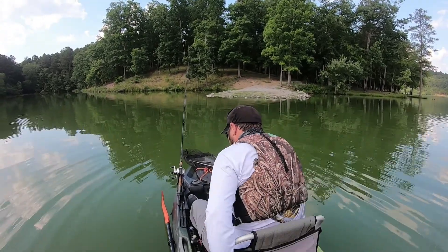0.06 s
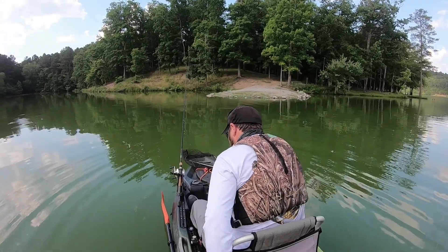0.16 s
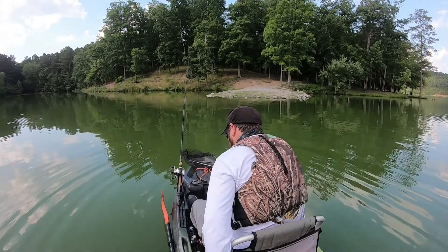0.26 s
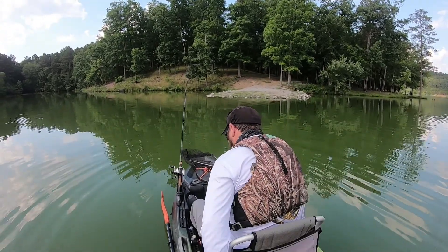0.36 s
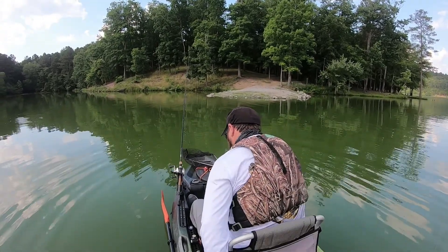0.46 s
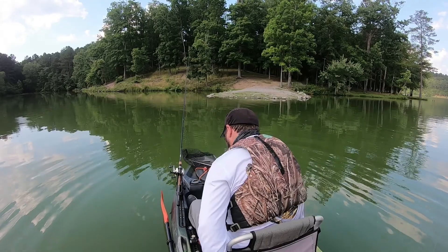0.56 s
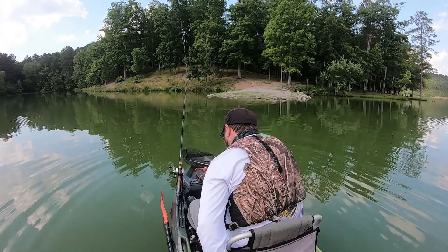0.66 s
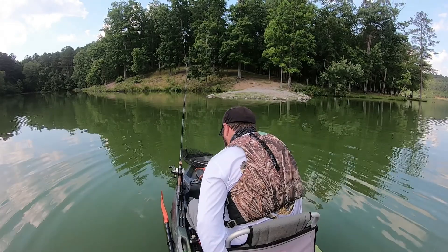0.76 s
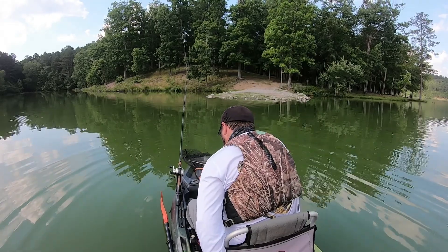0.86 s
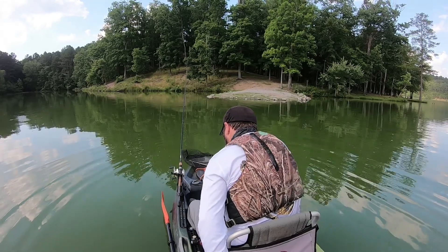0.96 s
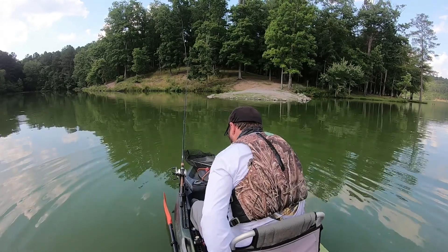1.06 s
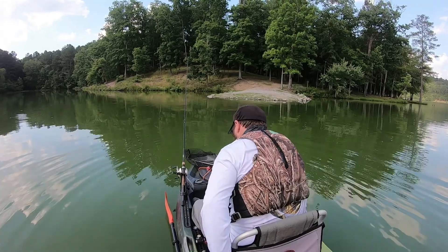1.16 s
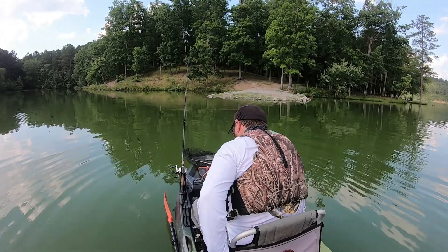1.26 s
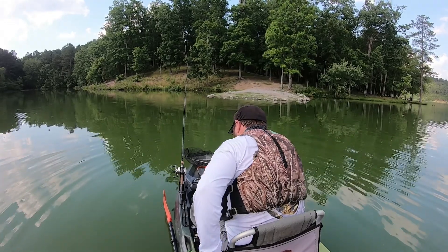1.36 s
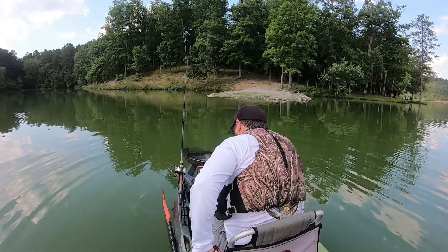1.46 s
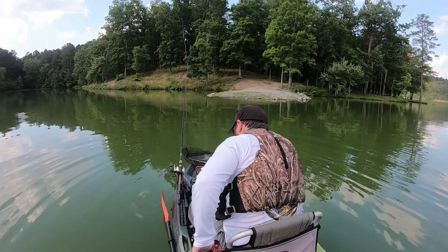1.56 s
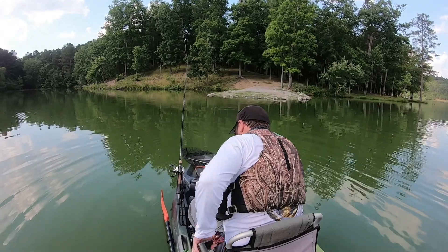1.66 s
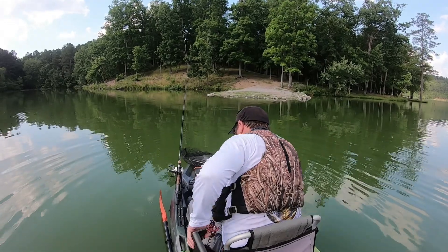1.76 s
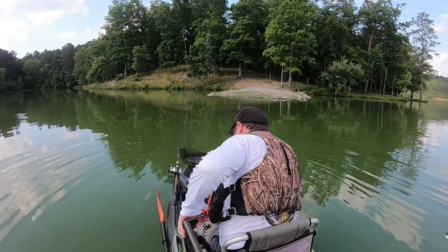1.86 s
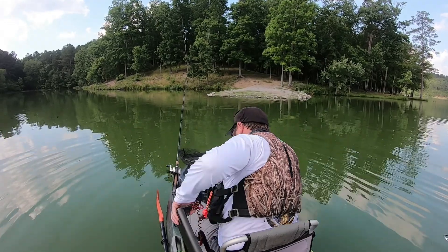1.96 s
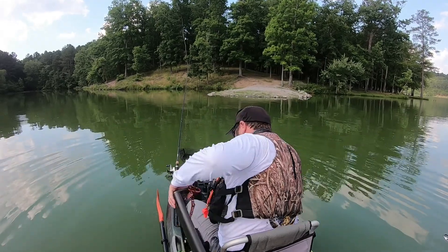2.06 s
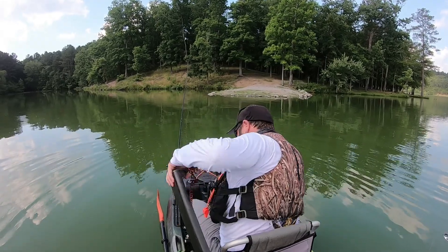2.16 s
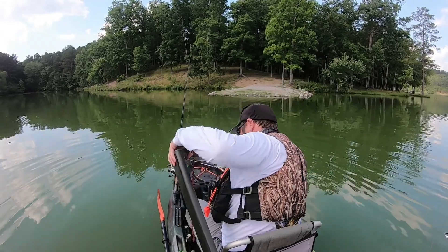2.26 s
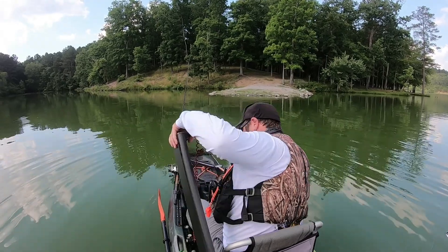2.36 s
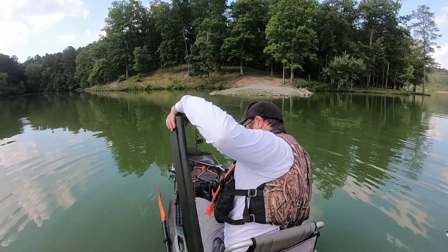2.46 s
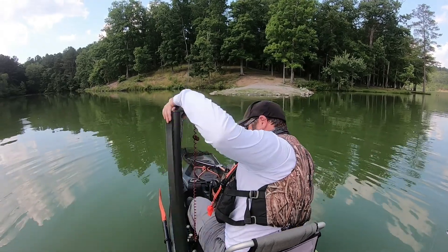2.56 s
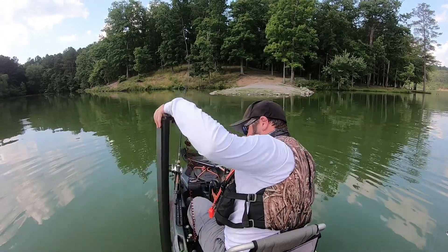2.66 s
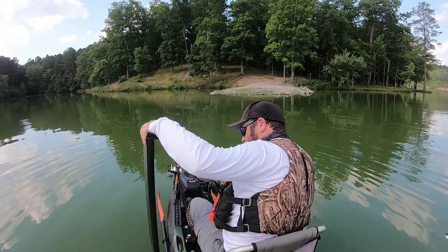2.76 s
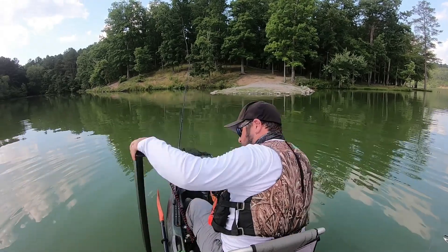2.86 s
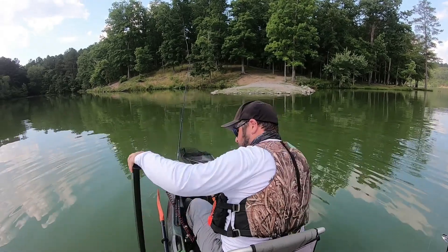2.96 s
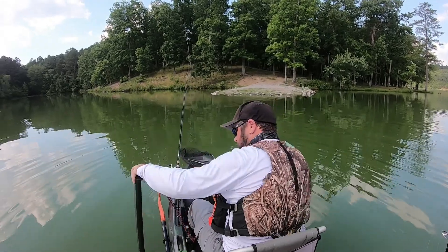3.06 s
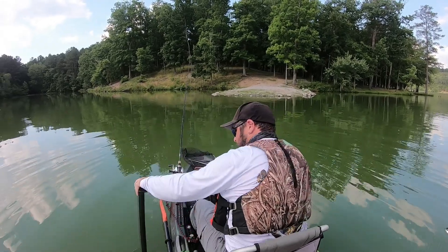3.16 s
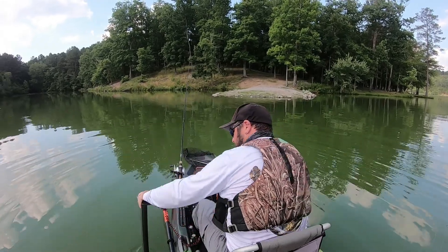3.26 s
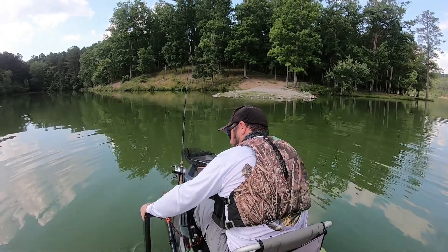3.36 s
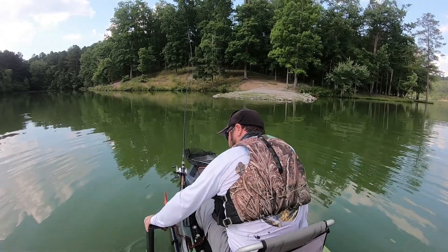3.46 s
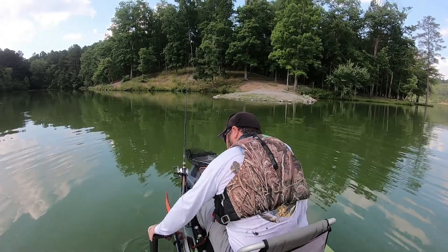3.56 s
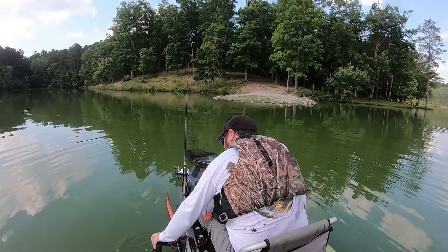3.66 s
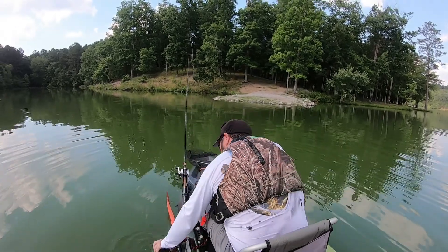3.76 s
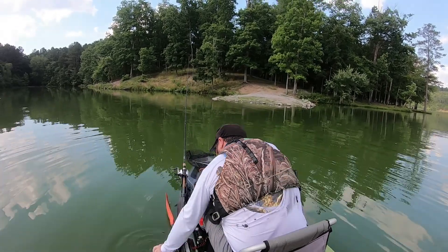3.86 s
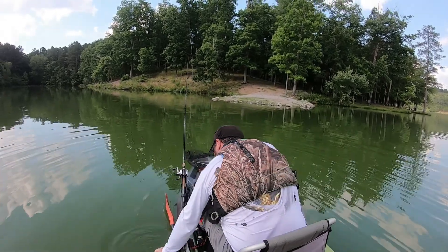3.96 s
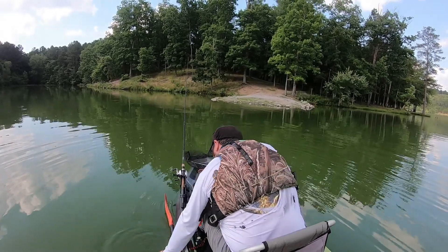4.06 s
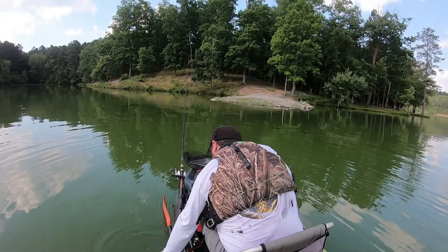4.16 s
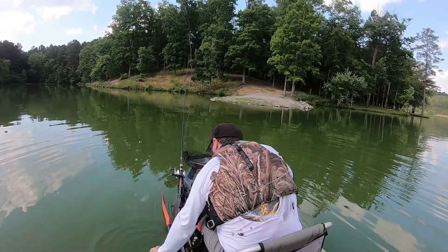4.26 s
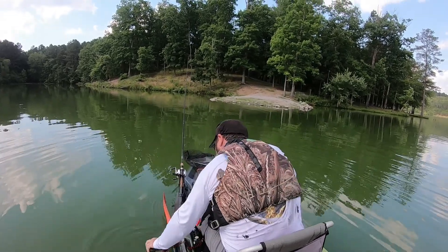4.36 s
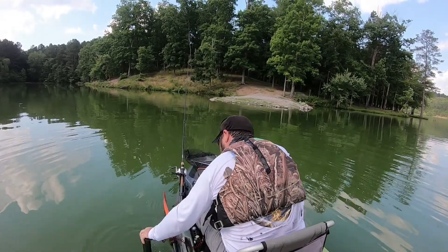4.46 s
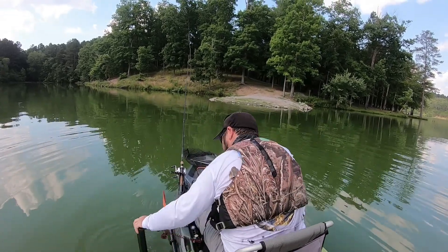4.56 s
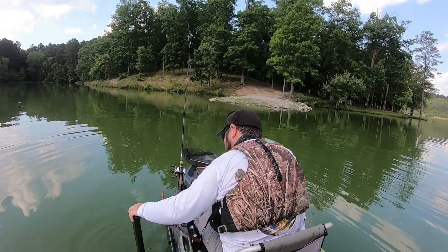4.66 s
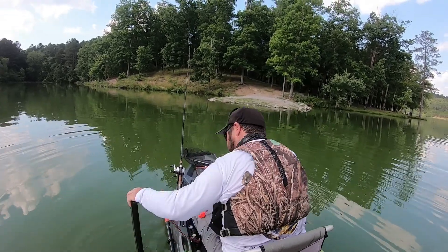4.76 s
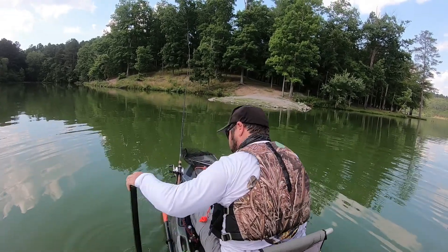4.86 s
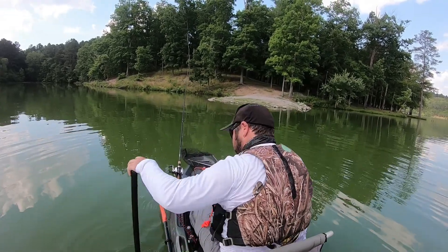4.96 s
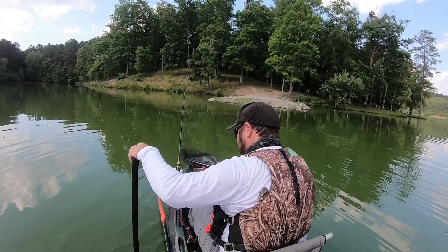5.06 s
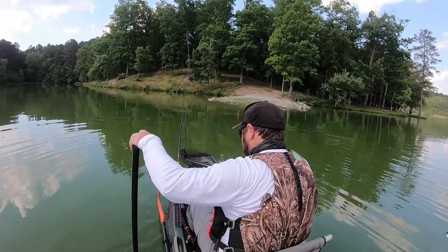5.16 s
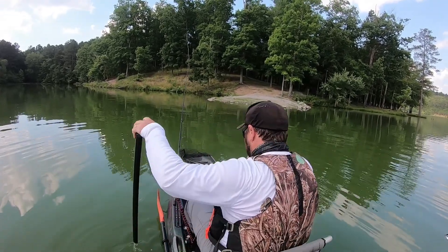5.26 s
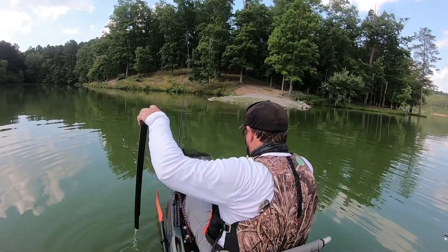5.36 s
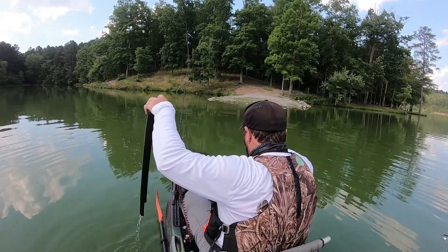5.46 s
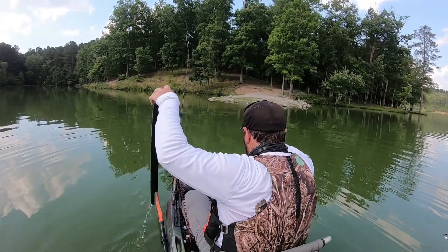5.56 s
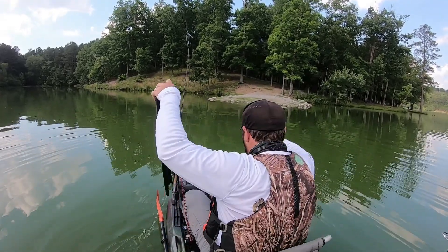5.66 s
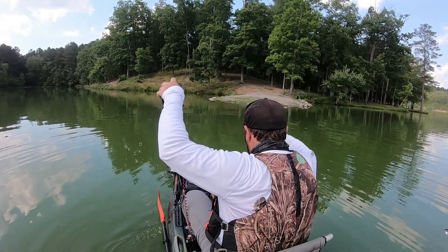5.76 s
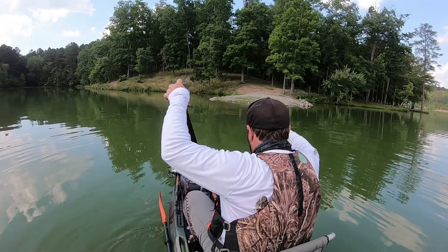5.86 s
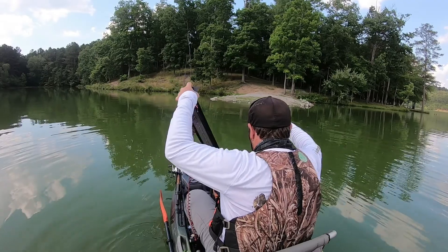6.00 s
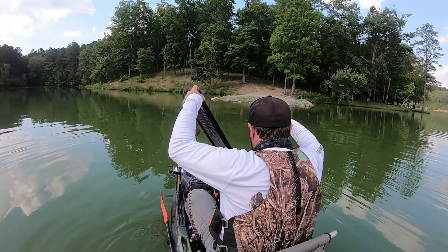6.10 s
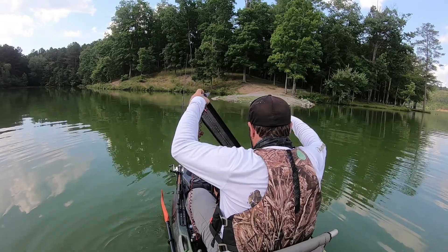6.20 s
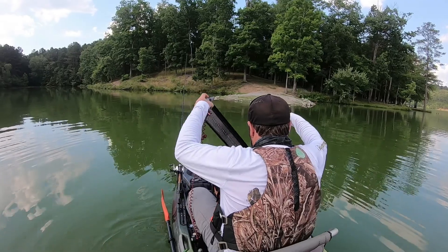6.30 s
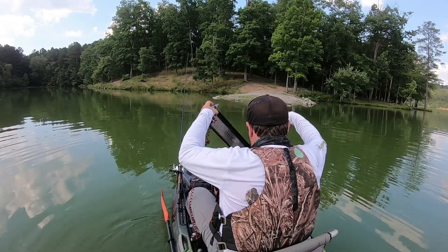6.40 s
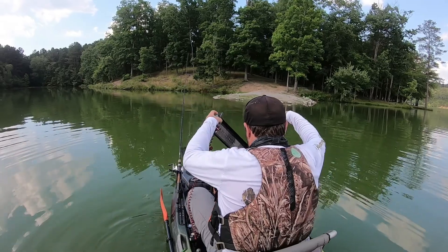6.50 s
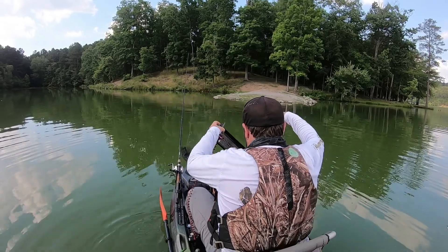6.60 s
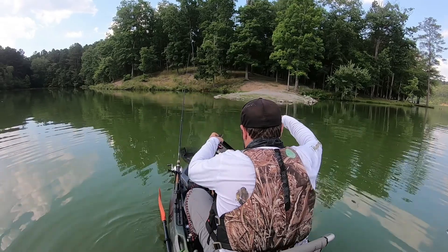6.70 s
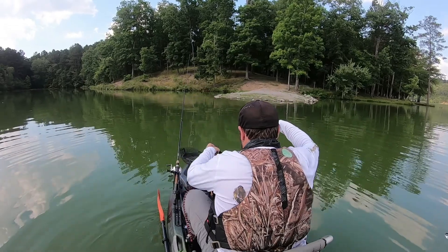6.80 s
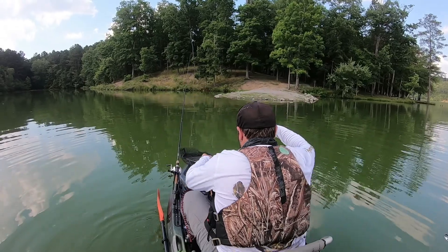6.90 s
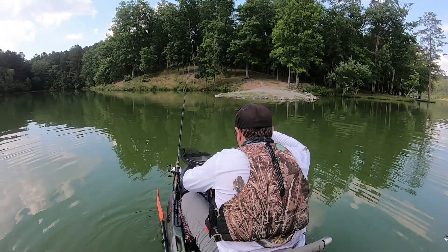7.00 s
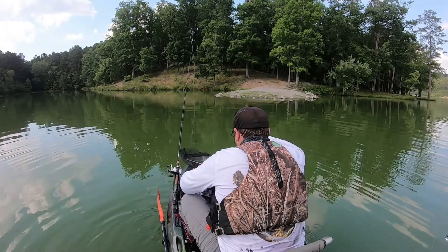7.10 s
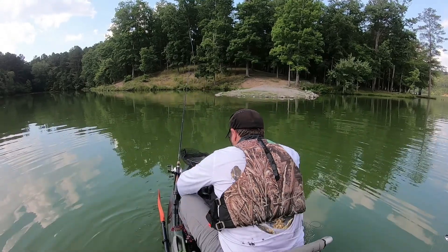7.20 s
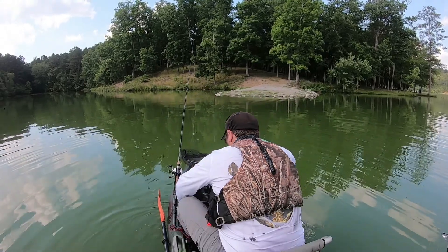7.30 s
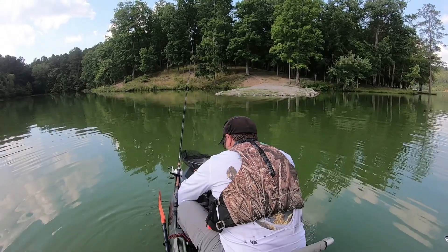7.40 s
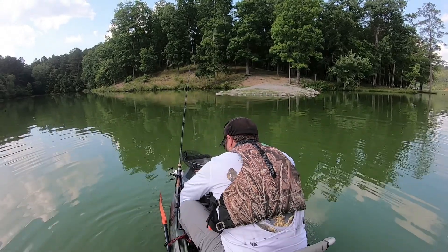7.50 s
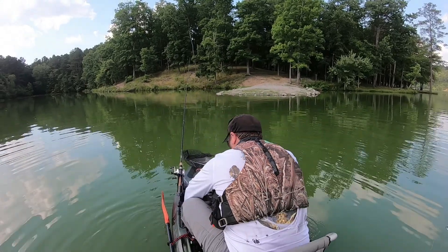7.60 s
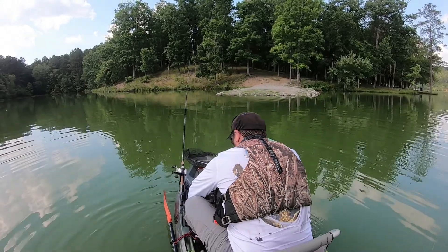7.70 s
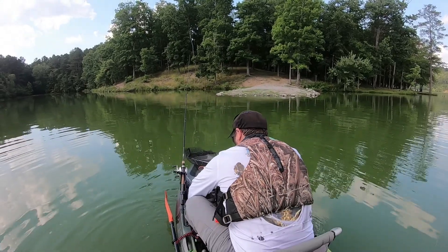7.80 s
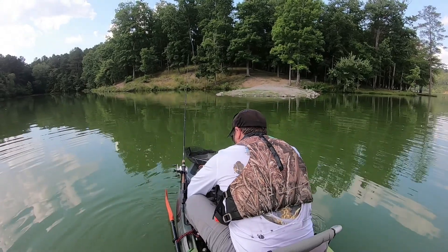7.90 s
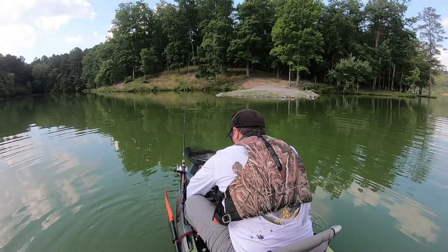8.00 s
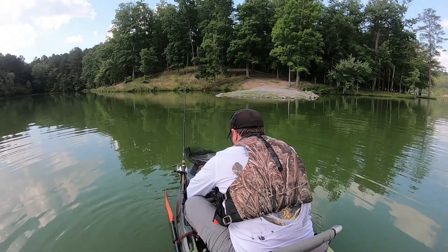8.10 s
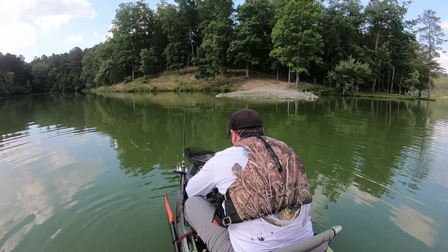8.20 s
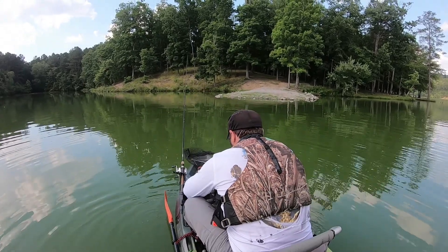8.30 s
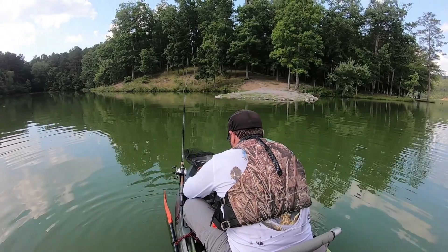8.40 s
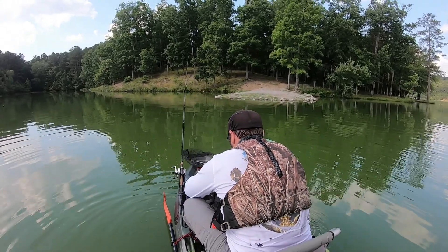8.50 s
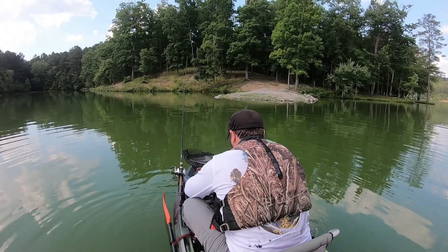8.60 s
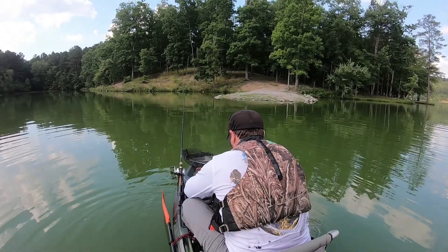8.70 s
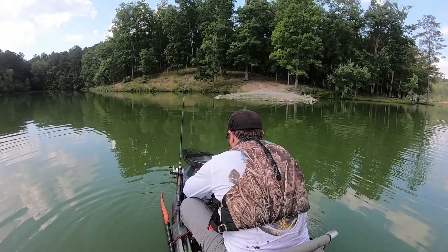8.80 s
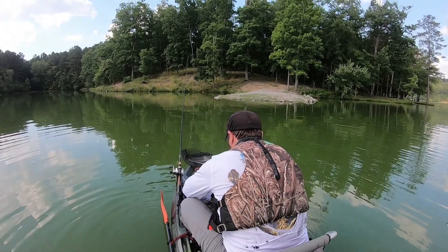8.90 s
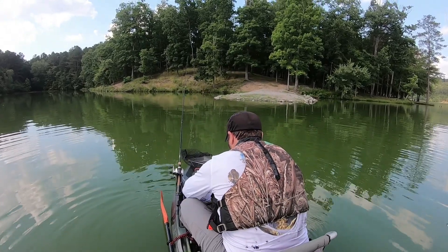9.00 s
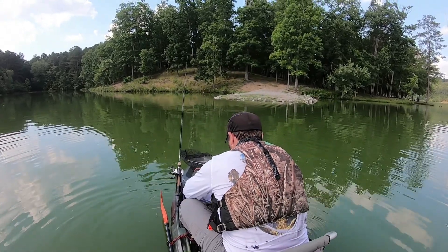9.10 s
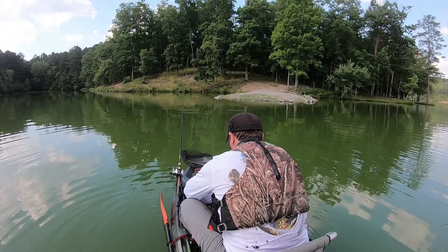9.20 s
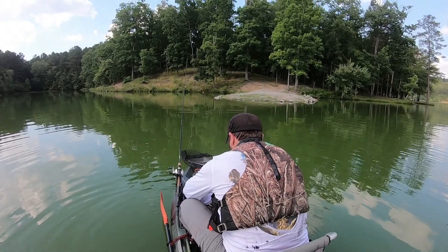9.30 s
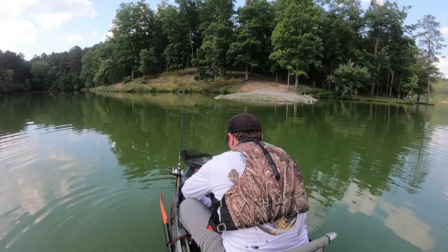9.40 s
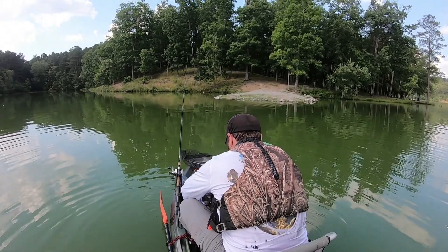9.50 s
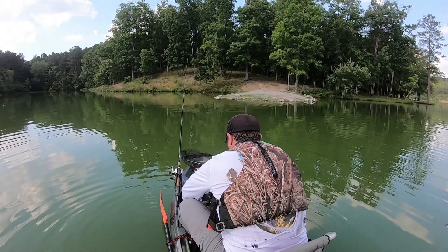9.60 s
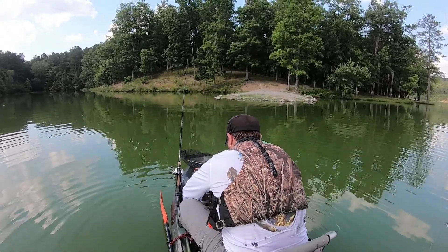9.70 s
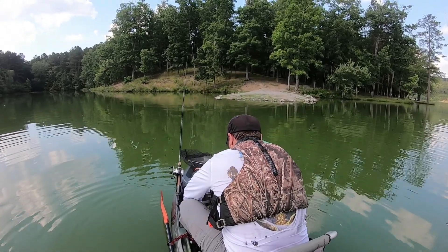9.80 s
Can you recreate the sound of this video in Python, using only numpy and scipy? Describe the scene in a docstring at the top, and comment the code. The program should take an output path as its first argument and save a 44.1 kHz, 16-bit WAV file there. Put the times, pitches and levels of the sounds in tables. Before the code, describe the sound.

Gear knocks, rattles and thumps in a hollow plastic kayak, with rustling cloth, water drips and faint birds.

```python
"""Shifting gear in a plastic kayak

On a calm lake, knocks ring the hull, the gear and small fittings, and a stiff joint clicks under load.
The hull booms and shakes a pole on the stern, which carries the two microphone ports we listen through.
Cloth and straps rustle, water drips from a lifted board, and birds sing from the wooded shore."""
import sys
import numpy as np
from scipy import signal
from scipy.fft import rfft, irfft, next_fast_len
from scipy.io import wavfile
from scipy.ndimage import uniform_filter1d

SR = 44100
rng = np.random.default_rng(int(sys.argv[2]) if len(sys.argv) > 2 else 0)


def store_pcm(level_fs):
    """Save levels as 16-bit WAV."""
    pcm = np.round(np.clip(level_fs, -1, 1) * 32767).astype(np.int16)
    wavfile.write(sys.argv[1], SR, np.atleast_2d(pcm).T)


N = 434385
T = np.arange(N) / SR
SIDE = np.array([[1], [-1]])  # opposite polarity left and right


def undb(db):
    return 10 ** (np.asarray(db) / 20)


def unit_rms(x):
    return x / np.sqrt(np.mean(x ** 2))


def decay(t, t60):
    return np.exp(-np.log(1000) * t / t60)


def curves(table):
    """Draw a table's columns out over time."""
    times, *columns = np.transpose(table)
    return [np.interp(T, times, column) for column in columns]


def resonate(x, hz, width_hz):
    return signal.lfilter(*signal.iirpeak(hz, hz / width_hz, fs=SR), x)


def bandpass(x, low_hz, high_hz):
    return signal.sosfilt(signal.butter(3, (low_hz, high_hz), "band", fs=SR, output="sos"), x)


def wander(per_s):
    """A smooth drift through random values."""
    hold = int(SR / per_s)
    steps = np.repeat(rng.standard_normal(N // hold + 1), hold)
    return uniform_filter1d(uniform_filter1d(steps, hold), hold)[:N]


def add(out, start, sound):
    """Mix a short sound in at start seconds."""
    i = int(start * SR)
    sound = sound[..., :N - i]
    out[:, i:i + sound.shape[-1]] += sound


def envelope(events, column, fade_db_per_s, attack_s=0.018):
    """Each event rises quickly to the level in the given column, holds, then fades."""
    power = np.zeros(N)
    for row in events:
        start, hold = row[:2]
        near = slice(max(int((start - attack_s) * SR), 0), int((start + 1) * SR))
        t = T[near] - start
        rise = np.clip(1 + t / attack_s, 0, 1)
        power[near] += (rise * undb(row[column] - fade_db_per_s * np.clip(t - hold, 0, 1))) ** 2
    return np.sqrt(power)


def strike(modes, db, grit, reach, focus_hz=None):
    """Grit rings the modes, favouring any near the focus, and cracks up to reach times the top mode."""
    t = T[:len(grit)]
    hz, mode_db, t60 = np.transpose(modes)[:, :, None]
    loudness, detune, skew = rng.standard_normal((3, len(modes), 1))
    if focus_hz:
        mode_db = mode_db - 14 * np.abs(np.log2(hz / focus_hz))
    lead = hz / 6000 * skew * SIDE[:, None] / 2  # each mode reaches one port slightly ahead
    tones = np.sin(2 * np.pi * hz * (1 + 0.052 * detune) * t + lead)
    ring = (undb(mode_db + 2 * loudness) * tones * decay(t, t60)).sum(1)
    body = signal.fftconvolve(ring, grit[None], axes=1)[:, :len(t)]
    crack = 0.84 * grit / np.abs(grit).max()
    hit = bandpass(body / np.abs(body).max() + crack, 0.48 * hz.min(), reach * hz.max())
    return undb(db) * hit / np.sqrt(uniform_filter1d(hit ** 2, SR // 200).max())  # db sets the loudest 5 ms


# What a knock rings, low to high: the hollow, hull panels, gear, fittings and the snap on top.
# Each row: pitch in Hz, relative level in dB, 60 dB ring time in seconds.
HOLLOW_MODES = [(300.2, -3.5, 0.08), (391.6, -0.7, 0.066), (465, -3.5, 0.068), (550.4, -3, 0.05),
                (627, 0, 0.025)]
PANEL_MODES = [(690, -2, .02), (800, -4, .018), (880, 0, .018), (1010, 0, .016), (1150, -3, .015),
               (1335, -3, .015), (1470, -4, .014)]
GEAR_MODES = [(1725, -2.5, 0.014), (1920, -0.5, 0.021), (2270, 3, 0.0082), (2535, 0, 0.022),
              (2600, -7.5, 0.017), (2910, 10.5, 0.011), (3304, 10.5, 0.012), (3930, 16, 0.0066),
              (4410, 9.5, 0.013), (4900, 9, 0.01)]
FITTING_MODES = [(5200, -2, .006), (5900, -3, .006), (6600, -2, .006), (7300, -2, .005), (8000, 1, .006),
                 (8600, 1, .007)]
SNAP_MODES = [(10800, 0, .004), (12000, -3, .004), (13500, -7, .003), (14500, -10, .003)]
# Gear, buckles and board making contact. Each row: start in seconds, levels of gear, hollow, panels
# and fittings in dB, focus of the gear's ring in Hz.
KNOCKS = [(0.2367, -60, -45.5, -50.5, -60, 2110), (0.38, -67, -44, -54, -83, 1710),
          (0.4722, -33.5, -35.5, -43, -30, 2920), (0.6616, -43.5, -43, -44, -47, 2330),
          (0.6889, -46, -42.5, -48, -62, 2680), (0.8215, -45, -43, -43, -68, 1760),
          (1, -45, -46, -43, -63, 1840), (1.037, -49, -51, -62, -75, 2430),
          (1.0705, -55, -50, -47.5, -70, 1800), (1.103, -46.5, -41.5, -55, -52.5, 3480),
          (1.292, -47, -33, -38, -56, 1740), (1.3233, -40, -39, -32.5, -48, 1712),
          (1.3667, -49, -35, -34.5, -49, 1730), (1.4073, -45, -44, -43, -51, 1960),
          (1.4415, -25.5, -25, -24.5, -31, 1730), (1.4502, -39, -23, -34, -42, 1990),
          (1.4718, -42, -39, -32.5, -54, 1710), (1.6157, -34, -45, -42, -42, 2420),
          (1.6254, -29, -27.5, -22, -40.5, 1860), (1.6853, -50, -32.5, -38, -63, 1820),
          (1.7157, -31, -34.5, -39, -46, 2740), (1.732, -25, -29, -17, -39.5, 1710),
          (1.755, -43, -36, -43, -61, 2650), (1.7635, -38, -48, -28.5, -61, 1920),
          (1.7874, -39, -39, -42, -65, 1980), (1.7957, -41, -28, -28.5, -68, 1980),
          (1.8162, -29.5, -27, -21.5, -54, 2000), (1.8313, -36, -23.5, -37, -60, 2930),
          (1.8828, -33, -30.5, -32.5, -51, 3480), (1.9573, -36, -15.5, -32, -60, 1980),
          (1.9681, -34, -34.5, -25, -51, 2830), (2.0113, -36.5, -34, -35, -55, 2640),
          (2.0349, -29, -22, -22, -50, 2000), (2.213, -46, -45, -38.5, -67, 2230),
          (2.2392, -22, -16.5, -16, -48, 1630), (2.2469, -28, -16, -23, -63, 1690),
          (2.256, -42, -30, -28, -62, 2300), (2.2855, -32, -48, -37, -66, 3600),
          (2.2793, -31, -44.5, -56, -61, 2450), (2.2941, -34, -45, -37, -42.5, 3220),
          (2.528, -54.5, -71, -68, -71, 4300), (3.0175, -55.5, -48.5, -56, -57, 3310),
          (3.119, -39, -32, -39, -43, 2470), (3.1241, -36, -38, -46, -64, 5000),
          (3.4736, -48.5, -48, -54, -68, 2660), (3.6638, -35.5, -40.5, -36.5, -51.5, 2020),
          (3.7523, -46, -70, -55, -84, 2940), (3.8512, -30.5, -22.5, -28.5, -57, 3880),
          (3.863, -50, -27.5, -35.5, -75, 1920), (3.877, -61, -34, -41, -78, 1900),
          (3.897, -47, -46, -53, -71, 1660), (3.966, -55, -46, -52, -55, 1800),
          (4, -50.5, -66, -49.5, -78, 1770), (4.055, -50, -57, -54, -59, 2960),
          (4.0765, -33.5, -40, -34.5, -37.5, 3760), (4.094, -66, -56, -52, -68, 1800),
          (4.2681, -50.5, -73, -54, -85, 1730), (4.487, -47.5, -72, -61, -71, 4550),
          (4.6038, -42.5, -64, -60, -53.5, 2900), (4.6903, -44, -48.5, -51.5, -56, 2800),
          (4.7069, -45.5, -43, -61, -61, 2430), (4.9232, -56, -56, -51.5, -80, 2100),
          (4.989, -54, -45, -48, -81, 1710), (5.1748, -47, -45, -45.5, -72, 1910),
          (5.2533, -49.5, -44.5, -45, -72, 2030), (5.3773, -51, -44.5, -45, -79, 1940),
          (5.443, -43.5, -60, -60, -55.5, 4380), (5.5515, -50, -49, -52, -58, 3150),
          (5.654, -48, -61, -62, -50, 4740), (5.7674, -76, -60, -77, -60, 2900),
          (5.7902, -79, -57, -78, -54.5, 2860), (6.0027, -45.5, -39.5, -43, -52.5, 3266),
          (6.0334, -49, -49.5, -55, -58, 2090), (6.355, -55.5, -46, -56, -66, 2480),
          (5.955, -59, -51, -59, -72, 2670), (6.308, -62, -50.5, -53, -75, 1840),
          (6.327, -55.5, -52, -68, -75, 3016), (6.45, -67, -52, -58, -62, 1983),
          (.218, -59, -54.5, -54, -78, 1750), (.548, -54, -58, -54, -63, 2010),
          (8.502, -68, -50.5, -58, -72, 2300), (6.8839, -44.5, -38, -37.5, -62, 1900),
          (6.893, -53, -43.5, -46, -67, 2494), (6.9641, -57, -39.5, -45.5, -73, 2140),
          (6.976, -62, -43.5, -60, -75, 1985), (7.204, -55, -43, -42, -70, 2190),
          (7.2439, -50, -35.5, -49, -75, 2306), (7.2806, -46, -54, -40, -57, 3240),
          (7.2974, -35, -39, -43, -43.5, 3790), (7.4999, -58.5, -51.5, -51, -74, 1844),
          (7.8605, -53, -73.5, -58.5, -76.5, 3000), (8.092, -61, -47.5, -54.5, -84, 1710),
          (8.1364, -57.5, -68, -69, -86, 1970)]


def knocks():
    """Each contact is a tiny scrape that rings boat and gear; louder ones tend to last longer."""
    out, t = np.zeros((2, N)), T[:SR // 15]
    for start, gear_db, hollow_db, panel_db, fitting_db, focus_hz in list(KNOCKS) + loose_contacts():
        weight = undb(0.15 * (max(gear_db, panel_db) + 46))
        scrape_s = 0.0022 * weight * np.exp(0.15 * rng.standard_normal())
        pressure = (t / scrape_s) ** 1.16 * np.exp(-2.1 * t / scrape_s)
        friction = pressure * rng.standard_normal(len(t))
        specks = np.repeat(rng.standard_normal(len(t) // 32 + 1), 32)[:len(t)]
        grit = friction * undb(2.8 * specks)  # the surfaces catch unevenly
        add(out, start, strike(HOLLOW_MODES, hollow_db, grit, reach=1.2))
        add(out, start, strike(PANEL_MODES, panel_db, grit, reach=1.2))
        add(out, start, strike(GEAR_MODES, gear_db, grit, reach=1.15, focus_hz=focus_hz))
        add(out, start, strike(FITTING_MODES, fitting_db, grit, reach=1.07))
        add(out, start, strike(SNAP_MODES, max(fitting_db - 23, gear_db - 43), grit, reach=1.06))
    return out


def loose_contacts(ticks_per_s=3.2, clatter_per_s=130):
    """More rows of knocks: stray ticks that follow the rustle, and clatter while gear is dragged."""
    when, size, focus = rng.random((int(ticks_per_s * N / SR), 3)).T
    starts = when * T[-1]
    db = np.interp(starts, T, curves(RUSTLE)[1]) + 9.5 + 8 * size
    rows = list(zip(starts, db, db - 4.5, db - 9.5, db - 26, 1800 + 2500 * focus))
    for start, hold, dull_db, *_ in DRAGS:
        when, size, focus = rng.random((int(clatter_per_s * hold) + 1, 3)).T
        db = dull_db + 1 - 10 * size
        rows += zip(start + hold * when, db - 12.5, db, db - 3, db - 21.5, 1800 + 2500 * focus)
    return rows


# Soft, heavy blows. Each row: start in seconds, level in dB, pitch in Hz, 60 dB ring time in seconds.
THUMPS = [(0.241, -45.5, 179.8, 0.09), (0.471, -30, 149, 0.17), (0.903, -32, 194, 0.064),
          (1.299, -25, 72, 0.13), (1.354, -19, 104, 0.17), (1.694, -19, 159.4, 0.1),
          (1.718, -18.5, 193, .2), (1.768, -17.5, 148.4, .12), (1.815, -15, 172.6, 0.16),
          (1.957, -11.5, 85.9, 0.11), (2.243, -13.5, 148.3, 0.25), (3.855, -30, 141, 0.15),
          (3.9, -23.5, 114.6, 0.28), (5.836, -34, 153.4, 0.072), (6.054, -43.5, 178.2, 0.69),
          (6.111, -43, 178, 0.19), (6.971, -19, 75.5, 0.051), (7.125, -29, 222, 0.061),
          (7.209, -29, 153, 0.047), (7.246, -20.5, 208, 0.036), (8.112, -39, 152, 0.077)]


def thumps():
    """A struck hull panel gives a low note with a brief overtone."""
    out, t = np.zeros((2, N)), T[:SR // 2]
    attack = 1 - np.exp(-t / 0.00043)
    for start, db, hz, t60 in THUMPS:
        note = np.sin(2 * np.pi * hz * t)
        overtone = 0.36 * np.sin(2 * np.pi * 1.9 * hz * t + rng.uniform(0, 2 * np.pi)) * np.exp(-t / .03)
        add(out, start, undb(db) * (note + overtone) * decay(t, t60) * attack)
    return out


def scattered_ring(modes, t):
    """Dying modes, a little different in level and tuning each time."""
    ring = 0
    for hz, db, t60 in modes:
        gain = undb(db + 2 * rng.standard_normal())
        pitch = hz * (1 + 0.029 * rng.standard_normal())
        ring += gain * np.sin(2 * np.pi * pitch * t) * decay(t, t60)
    return ring


# The ring of a stiff buckle or seat joint, and of the hull beneath it.
# Each row: pitch in Hz, relative level in dB, 60 dB ring time in seconds.
JOINT_MODES = [(2320, -49, 0.0015), (2530, -5, 0.0086), (2640, 15, 0.0089), (2850, 18.5, 0.0068),
               (3470, 6, 0.0084), (3800, -5, 0.0048), (5200, 10.5, 0.0088), (5900, 2, 0.0078),
               (6460, -6, 0.0081), (7800, -20, 0.0064)]
SEAT_MODES = [(260, 1, 0.03), (570, -1, 0.02), (890, -1, 0.016), (1350, -4, 0.015), (1670, -7, .012)]
# The joint's slips. Each row: time in seconds, tick level in dB, level of the hull's answer in dB.
CLICKS = [(5.829, -38, -56), (6.418, -40.5, -52), (6.508, -41, -51.5), (7.012, -32.5, -56),
          (7.0434, -31.5, -55), (7.066, -32, -48.5), (7.092, -33.5, -65), (7.1124, -36, -45),
          (7.1198, -40, -54), (7.144, -40.5, -63), (7.1625, -57, -54), (7.169, -48, -54), (7.208, -33, -48),
          (7.4028, -36.5, -52), (8.3648, -37.5, -50), (8.3724, -47.5, -47.5), (8.5214, -30.5, -46),
          (8.5998, -33.5, -46.5), (8.6718, -36.5, -46.5), (8.747, -42, -51), (8.7524, -39, -49)]


def joint_clicks():
    """The loaded joint slips in quick catches: a rough tick, then a hollow answer from the hull."""
    out, t = np.zeros((2, N)), T[:SR // 15]
    for time, tick_db, answer_db in CLICKS:
        ring = scattered_ring(JOINT_MODES, t)
        slip = rng.standard_normal(len(t)) * t * np.exp(-t / .0005)
        tick = bandpass(signal.fftconvolve(ring, slip)[:len(t)], 1210, 8900)
        hull = scattered_ring(SEAT_MODES, t) * (1 - np.exp(-t / 0.0011))
        buzz = bandpass(rng.standard_normal(len(t)) * np.exp(-t / 0.0074), 220, 1620)  # plastic settling
        answer = hull + 1.6 * buzz
        add(out, time - .0006, undb(tick_db - 3) * tick / np.abs(tick).max())
        add(out, time + .00092, undb(answer_db + 6) * answer / np.abs(answer).max())
    return out


def hull_tail(hits):
    """The hollow hull scatters every blow into a short, dull tail."""
    t = T[:SR // 4]
    tail = bandpass(rng.standard_normal((2, len(t))), 80, 4000) * decay(t, t60=0.14)
    return undb(-33.5) * signal.fftconvolve(hits, tail, axes=1)[:, :N]


def rumble(modes):
    """A lumpy force drives broad, low resonances."""
    force = rng.standard_normal(N) * undb(2 * wander(25) + 2.8 * wander(5))
    return unit_rms(sum(undb(db) * resonate(resonate(force, hz, width), hz, 2 * width)
                        for hz, width, db in modes))


# Low resonances of hull and pole. Each row: centre in Hz, width in Hz, relative level in dB.
HULL_MODES = [(70.5, 22, -6.5), (92, 34, -1.5), (126.6, 46, 2.5), (150.9, 21, 1), (183.9, 25.5, 0.5),
              (300.2, 41, -8), (389.4, 45, -17)]
POLE_MODES = [(41.4, 23.5, 4.5), (69, 25, -3)]
# The boat's steady rocking. Each row: time in seconds, hull boom in dB, pole shake in dB.
ROCKING = [(0.0, -61, -54.5), (1.34, -48.5, -52), (1.48, -54, -54), (1.92, -42, -52), (2.25, -45, -48),
           (2.49, -59, -47), (2.77, -57.5, -70), (3.87, -46, -52), (4.17, -58, -58), (6.01, -51, -81.5),
           (6.83, -67.5, -92), (7.13, -42, -39), (7.6, -69.5, -63.5), (8.42, -59, -64.5), (9.22, -73, -94),
           (9.85, -60, -91)]
# Weight and gear shifting. Each row: start and hold in seconds, hull boom in dB, pole shake in dB.
SHOVES = [(0.246, 0.018, -40, -38.5), (0.453, 0.051, -44, -40.5), (0.814, 0.032, -42.5, -40),
          (1.288, 0.079, -27.5, -34), (1.41, 0.077, -34, -31.5), (1.63, 0.021, -32, -42),
          (1.695, 0.046, -21, -36), (1.761, 0.068, -26, -32), (1.959, 0.029, -21, -46),
          (2.05, 0.1, -37, -43), (2.238, 0.027, -20, -31), (3.331, 0.2, -42.5, -43.5),
          (3.851, 0.073, -36.5, -40.5), (5.283, 0.16, -59.5, -65), (6.085, .05, -52.5, -81),
          (6.896, 0.034, -38, -37), (6.962, 0.06, -41.5, -30), (7.115, 0.025, -40, -53),
          (7.221, 0.036, -45, -34), (8.105, 0.026, -46.5, -42.5)]


def boom_and_shake():
    """Rocking and shoves make the hull boom; the shaking pole pushes the two ports against each other."""
    boom_db, shake_db = curves(ROCKING)
    boom_gain = np.hypot(undb(boom_db), envelope(SHOVES, column=2, fade_db_per_s=254.5))
    shake_gain = np.hypot(undb(shake_db), envelope(SHOVES, column=3, fade_db_per_s=109))
    boom = rumble(HULL_MODES) + 0.2 * SIDE * rumble(HULL_MODES)
    shake = rumble(POLE_MODES) * np.array([[-1.68], [3.86]])
    return boom_gain * boom + shake_gain * shake


# Cloth and straps rubbing. Each row: time in seconds, then dull, bright and hiss levels in dB.
RUSTLE = [(0.0, -61.5, -76, -85), (0.46, -61, -76, -77), (1.07, -56.5, -75, -82), (1.29, -46, -71, -62.5),
          (1.67, -55.5, -63, -71.5), (1.86, -45, -70.5, -76), (2.22, -50.5, -66, -77), (2.6, -61, -73, -91),
          (3.81, -43.5, -59, -77), (4.14, -57.5, -68, -83.5), (4.53, -51.5, -63.5, -77),
          (5.05, -58, -70.5, -85), (5.54, -57, -59.5, -70.5), (6.06, -66, -76, -86.5),
          (6.86, -60, -73.5, -81), (7.13, -50, -68.5, -78.5), (7.82, -64.5, -81, -95.5),
          (9.85, -82, -77, -84.5)]
# Gear dragged on the hull. Each row: start and hold in seconds, then dull, bright and hiss levels in dB.
DRAGS = [(0.656, 0.15, -49.5, -68.5, -78), (0.997, 0.16, -51.5, -68, -75.5), (1.298, 0.16, -39, -80, -61.5),
         (1.711, 0.13, -44, -61, -68), (1.966, 0.135, -43.5, -52.5, -62), (2.223, 0.078, -38.5, -65, -64.5),
         (3.069, 0.22, -60.5, -62, -76), (3.675, 0.17, -60, -75, -86), (4.621, 0.11, -59, -65, -84),
         (5.474, 0.087, -64, -78, -70), (5.992, 0.097, -55, -68, -78), (6.298, 0.075, -57, -70, -86),
         (6.873, 0.054, -54, -69, -74), (6.992, 0.41, -55.5, -65.5, -76.5),
         (7.66, 0.087, -72, -68.5, -79.5), (8.055, 0.09, -82, -83.5, -104)]


def rustle():
    """Cloth, straps and dragged gear rub in short catches, a few much stronger than the rest."""
    catches = np.repeat(rng.exponential(size=N // 64 + 1), 64)[:N]
    grain = undb(0.76 * catches + 2 * wander(30))
    dull, bright, hiss = (np.hypot(undb(db), envelope(DRAGS, column, fade_db_per_s=198))
                          for column, db in enumerate(curves(RUSTLE), start=2))
    out = 0
    for low_hz, high_hz, gain, spread in ((360, 1150, 0.17 * dull, .5), (1090, 2370, 0.2 * dull, .3),
                                          (2370, 4270, bright, .3), (4700, 8280, hiss, .5)):
        mid, side = map(unit_rms, bandpass(grain * rng.standard_normal((2, N)), low_hz, high_hz))
        out += gain * (mid + spread * side * SIDE)
    return out


# Drops falling back into the lake.
# Each row: start in seconds, starting pitch in Hz, level in dB, 60 dB ring time in seconds.
DRIPS = [(4.527, 890, -47.5, 0.091), (4.581, 2740, -37, 0.026), (4.633, 1085, -43, 0.045),
         (3.858, 1940, -31.5, 0.065), (3.064, 1880, -47.5, 0.04), (5.446, 1047, -41, 0.07),
         (5.551, 3396, -36.5, 0.019), (5.599, 2640, -42, 0.023), (5.641, 4320, -21.5, 0.0048),
         (5.658, 1600, -48, 0.045), (5.689, 3600, -27.5, 0.0056), (5.44, 4360, -37, 0.012),
         (5.625, 3800, -42, .02), (5.633, 2600, -40.5, 0.022), (5.79, 2980, -42, 0.022),
         (7.717, 1292, -49.5, 0.035)]
# The board meeting and leaving the water. Each row: start and end in seconds, base level in dB.
SPATTER = [(3.097, 3.798, -67), (4.391, 4.804, -63), (5.338, 5.9, -60.5)]


def drips(spatter_per_s=80, ring_cycles=24):
    """Each drop ticks and leaves a bubble whose note rises as it dies; spatter adds tiny drops and mist."""
    out, t, drops = np.zeros((2, N)), T[:SR // 8], list(DRIPS)
    for start, end, db in SPATTER:
        when, pitch, size = rng.random((int(spatter_per_s * (end - start)), 3)).T
        hz = 1230 * 2 ** (2.47 * pitch)
        drops += zip(start + (end - start) * when, hz, db - 4 * np.log(1 - size), ring_cycles / hz)
        mist = unit_rms(bandpass(rng.standard_normal((2, N)), 4500, 12600))
        arch = np.sin(np.pi * np.clip((T - start) / (end - start), 0, 1))
        out += mist * arch * undb(db - 23 + 9.9 * wander(200))
    attack = 1 - np.exp(-t / 0.000083)
    for start, hz, db, t60 in drops:
        bubble = np.sin(2 * np.pi * hz * (t + 1.3 * t ** 2)) * decay(t, t60) * attack
        tick = bandpass(rng.standard_normal(len(t)) * np.exp(-t / 0.001), 5720, 13000)
        tick_db = min(db, -39) - 19  # big drops tick no louder
        add(out, start, undb(db) * bubble + undb(tick_db) * tick)
    return out


def chirp(out, start, end, pitches, db, rasp, drift_db=None):
    """Mix in one bird note: a sine gliding through three pitches, rasping as pitch and level flutter."""
    progress = np.linspace(0, 1, max(int((end - start) * SR), 50))
    glide_hz = np.polyval(np.polyfit([0, .5, 1], pitches, deg=2), progress)
    pitch_flutter, level_flutter = uniform_filter1d(rng.standard_normal((2, len(progress))), 40)
    hz = glide_hz * (1 + rasp * pitch_flutter)
    if drift_db is not None:
        db = db + np.interp(start + progress * (end - start), T, drift_db)
    gain = undb(db + 4.5 + min(300 * rasp, 26) * level_flutter)
    arch = np.sqrt(np.sin(np.pi * progress).clip(0))
    add(out, start, gain * arch * np.sin(2 * np.pi * np.cumsum(hz) / SR))


# A small songbird's phrases, and HELD, one steady whistle of the lower, farther bird. Each row: start and end
# in seconds into the phrase, first, middle and # last pitch in Hz, relative level in dB, amount of rasp.
SLIDE = [(0, .025, 5200, 5300, 5700, -3, .1), (.003, .027, 6800, 7600, 8600, -4, .5),
         (.04, .125, 6500, 6100, 5000, 0, .05), (.043, .08, 7600, 7650, 7000, -1, .05)]
RISE = [(0, 0.035, 5200, 5480, 5470, 10.5, 0.16), (0.032, 0.132, 6030, 5900, 5720, 13, 0.1),
        (0.064, 0.14, 6900, 6500, 5400, 3, 0.83)]
FALL = [(0, 0.034, 6500, 6960, 7540, -0.9, 0.99), (0.041, 0.108, 5980, 5730, 5430, -0.21, 0.1)]
CHIP = [(0, 0.028, 5640, 5840, 6150, -1, 0.15), (0.021, 0.069, 6160, 5890, 6100, -10, 0.16)]
HELD = [(0, .11, 3590, 3560, 3570, 0, .01)]
# Its calls, and the farther bird's one steady whistle. Each row: start in seconds, phrase, level in dB.
SONG = [(.115, RISE, -81.5), (0.189, FALL, -70), (1.122, SLIDE, -62), (4.249, FALL, -76),
        (4.733, HELD, -62), (5.261, RISE, -87.5), (5.483, SLIDE, -68), (6.482, SLIDE, -71),
        (6.889, FALL, -67.5), (7.413, SLIDE, -68), (7.783, CHIP, -76), (8.089, CHIP, -85),
        (8.294, CHIP, -75), (8.445, CHIP, -72.5), (8.831, RISE, -83), (9.234, SLIDE, -64),
        (9.608, FALL, -71)]
# Dry chatter in the trees. Each row: time in seconds, level in dB.
CHATTER = [(7.926, -71), (7.9443, -74), (8.054, -71), (8.406, -66), (8.4339, -67), (8.9327, -75),
           (8.9564, -65.5), (9.087, -74), (9.392, -69), (9.427, -63.5), (9.5276, -71), (9.5834, -68),
           (9.784, -73), (9.831, -67.5)]


def songbirds():
    """One bird strings high notes into phrases, the farther bird holds one steady whistle; another chatters in
    short falling chips."""
    out = np.zeros((2, N))
    for time, phrase, db in SONG:
        for start, end, *pitches, note_db, rasp in phrase:
            chirp(out, time + start, time + end, pitches, db + note_db, rasp)
    for time, db in CHATTER:
        chirp(out, time - .002, time + .0062, (4200, 3600, 3000), db, rasp=.5)
    return out


# A lower, farther bird. Each row: start and end in seconds, first, middle and last pitch in Hz, level in dB.
WHISTLES = [(0.262, 0.3, 3100, 2950, 2750, -70), (.33, .47, 2850, 2950, 2910, -83),
            (0.535, 0.64, 3200, 2920, 2900, -72), (2.367, 2.394, 3200, 3300, 3230, -64),
            (2.415, 2.454, 3240, 3110, 3170, -73), (2.511, 2.633, 2950, 2836, 2910, -69),
            (2.545, 2.581, 3490, 3150, 2750, -65), (3.899, 3.977, 5280, 5310, 5330, -69.5),
            (5.1, 5.248, 2850, 2620, 2370, -77), (5.492, 5.56, 2810, 2950, 3000, -64),
            (5.968, 6.085, 2950, 3120, 2950, -69), (6.118, 6.21, 3050, 2860, 2660, -71),
            (8.14, 8.18, 3900, 4122, 4455, -81.5), (8.218, 8.25, 2900, 3070, 3210, -79.5),
            (8.57, 8.64, 4000, 3280, 3020, -77), (9.246, 9.343, 3500, 2985, 2680, -76.5),
            (9.472, 9.55, 3740, 3100, 2850, -74)]


def far_birds(twitters_per_s=20):
    """Whistles and faint random twitter waver in the air; the wider the glide, the more it rasps."""
    out = np.zeros((2, N))
    when, pitch, glide, size = rng.random((int(twitters_per_s * N / SR), 4)).T
    starts = when * T[-1]
    hz = 2700 * (1 + .5 * pitch)
    bend = .15 * hz * (glide - .6)
    twitter = list(zip(starts, starts + 0.036, hz, hz + bend / 2, hz + bend, -91 + 8 * size))
    air_db = 6 * wander(50)
    for start, end, *pitches, db in WHISTLES + twitter:
        rasp = 0.05 + 0.4 * np.ptp(pitches) / pitches[1]
        chirp(out, start, end, pitches, db, rasp, air_db)
    return out


def through_trees(calls):
    """Echoes from the trees smear the calls, and only the treble band is kept."""
    t = T[:SR // 2]
    trees = rng.standard_normal((2, len(t))) * decay(t, t60=0.29)
    echoes = undb(-30.5) * signal.fftconvolve(calls, trees, axes=1)[:, :N]
    return bandpass(calls + echoes, 2700, 9300)


# The tone of the shore. Each row: frequency in Hz, relative noise density in dB.
SHORE_SPECTRUM = [(15, -43), (25, -3.5), (92, -15), (167, 3), (219, -2.5), (282, -7), (552, -33.5),
                  (764, -12.5), (1080, -24), (2600, -29.5), (3780, -35), (4610, -40.5), (5770, -18),
                  (6540, -53), (9400, -35.5), (11000, -62), (21400, -120)]


def shore(level_db=-63):
    """Far air, leaves and insects: third-octave noise bands that swell together and flicker apart."""
    out, swell = 0, wander(0.35)
    hz_at, db_at = np.transpose(SHORE_SPECTRUM)
    for hz in 30 * 2 ** np.arange(0, 9, 1 / 3):
        noise = rng.standard_normal((2, N))
        mid, side = map(unit_rms, resonate(resonate(noise, hz, hz / 3), hz, hz / 3))
        band_db = np.interp(np.log(hz), np.log(hz_at), db_at) + 10 * np.log10(hz)
        out += undb(band_db + 2.1 * swell + 3.5 * wander(2.7)) * (mid + 1.1 * side * SIDE)
    return unit_rms(out) * undb(level_db)


def scene():
    """The boat up close, water beside it, birds and shore behind."""
    hits = knocks() + thumps() + joint_clicks()
    boat = hits + hull_tail(hits) + boom_and_shake() + rustle()
    return boat + drips() + through_trees(far_birds() + songbirds()) + shore()


# The two ports sit on different faces of their housing, so some mid spills into the side.
# Each row: frequency in Hz, spill level in dB, spill phase in radians.
PORT_SPILL = [(40, -2.5, 2.), (150, -5, 1.5), (330, -5.5, 1.6), (436.5, 8, 1.7), (583, -7.5, 1.4),
              (795, 6, 1.9), (1050, 0.5, 1.9), (1320, 5.5, 2.1), (1800, -6, 2.15), (4905, -7.5, 2),
              (8000, -0.5, 2.4), (12230, -5, 1.4)]
# The image folds towards mono for a while after the loud blows. Each row: time in seconds, side gain in dB.
STEREO_WIDTH = [(0, -0.5), (1.5, 1), (1.95, -16), (2.5, -34.5), (3.1, -53), (3.8, -71), (4.1, -65),
                (4.35, -34), (4.65, -15), (5.1, -7), (5.8, -4), (6.9, -1), (9.85, -0.5)]


def record(dry):
    """The bass rolls off, the ports colour the stereo image, it narrows for a while, and the top is cut."""
    left, right = signal.sosfilt(signal.butter(3, 33, "high", fs=SR, output="sos"), dry)
    mid, side = (left + right) / 2, (left - right) / 2
    size = next_fast_len(N)
    hz_at, db_at, rad_at = np.transpose(PORT_SPILL)
    log_hz = np.log(np.arange(size // 2 + 1) * SR / size + 1)
    spill_gain = undb(np.interp(log_hz, np.log(hz_at), db_at))
    spill_phase = np.interp(log_hz, np.log(hz_at), rad_at)
    side = side + irfft(rfft(mid, size) * spill_gain * np.exp(1j * spill_phase), size)[:N]
    width_db = curves(STEREO_WIDTH)[0]
    treble = signal.sosfiltfilt(signal.butter(4, 5050, "high", fs=SR, output="sos"), side)
    side = undb(width_db) * (side - treble) + undb(.45 * width_db) * treble  # the treble narrows less
    top_cut = signal.ellip(8, .2, 70, 15600, fs=SR, output="sos")
    return signal.sosfilt(top_cut, [mid + side, mid - side])


dry = scene()
out = record(dry)
store_pcm(out)
```